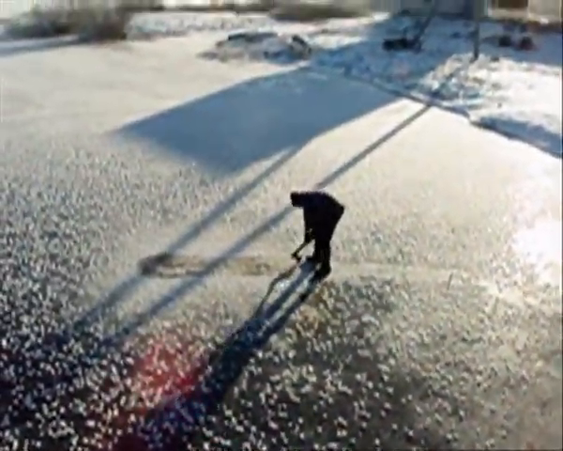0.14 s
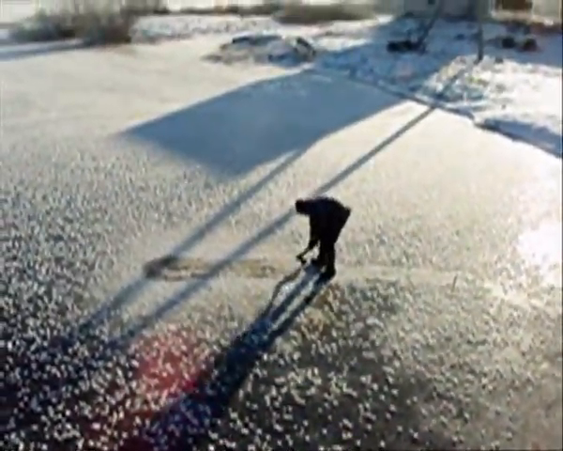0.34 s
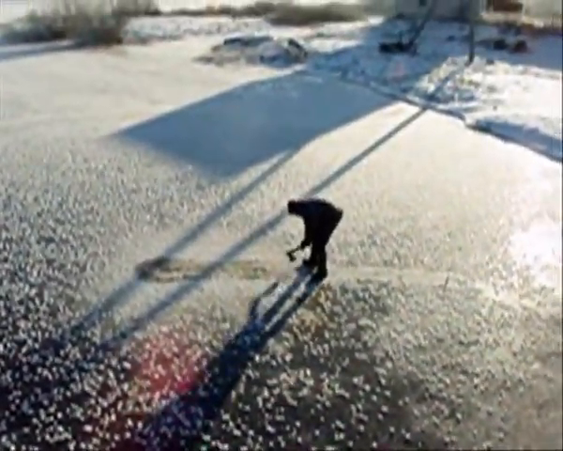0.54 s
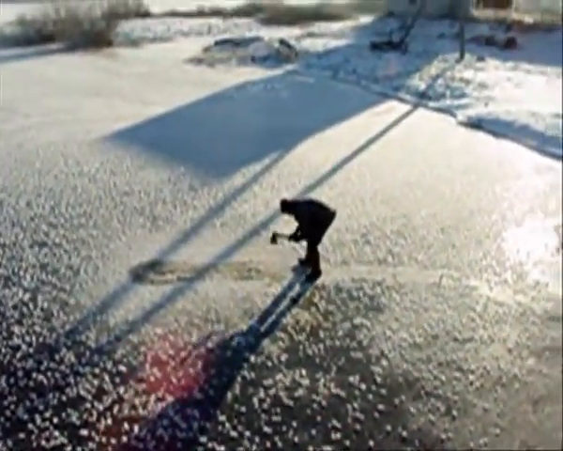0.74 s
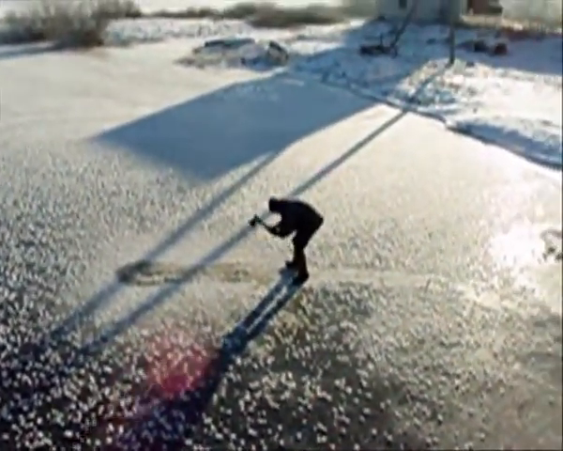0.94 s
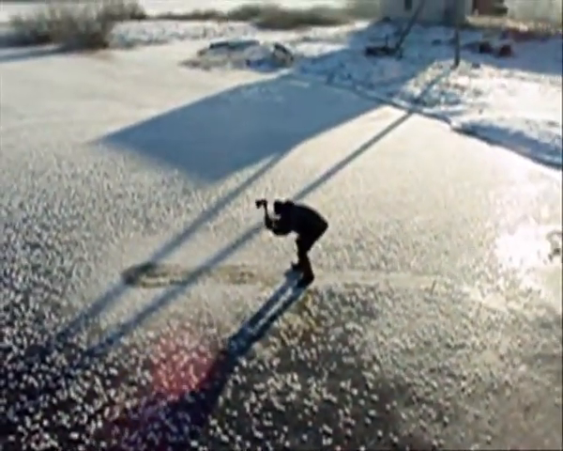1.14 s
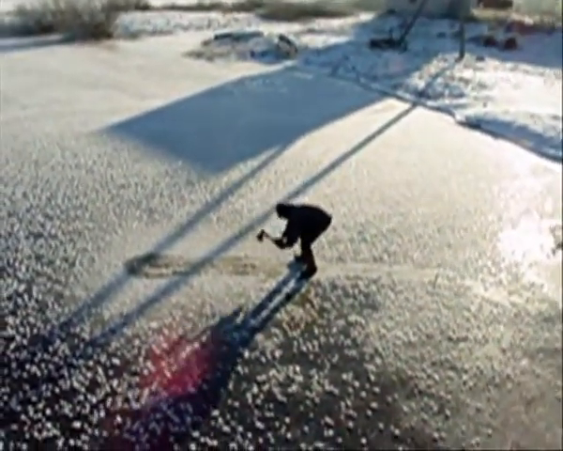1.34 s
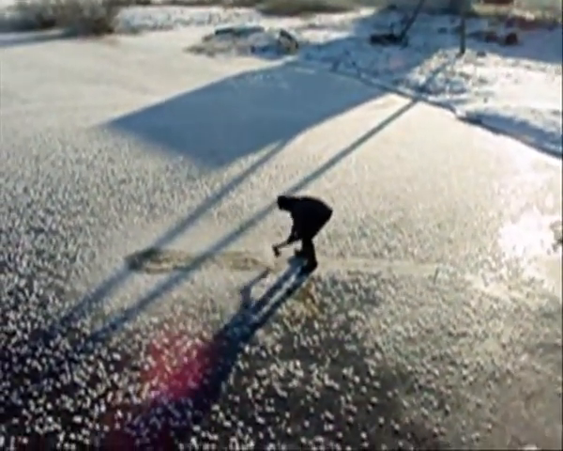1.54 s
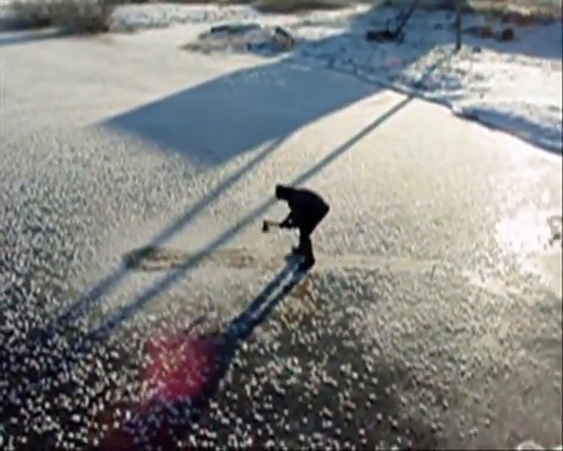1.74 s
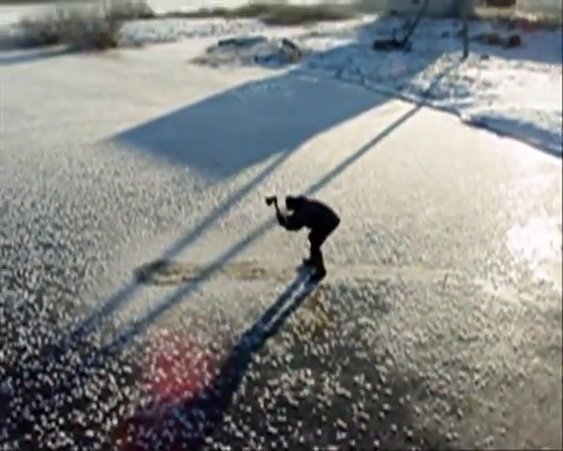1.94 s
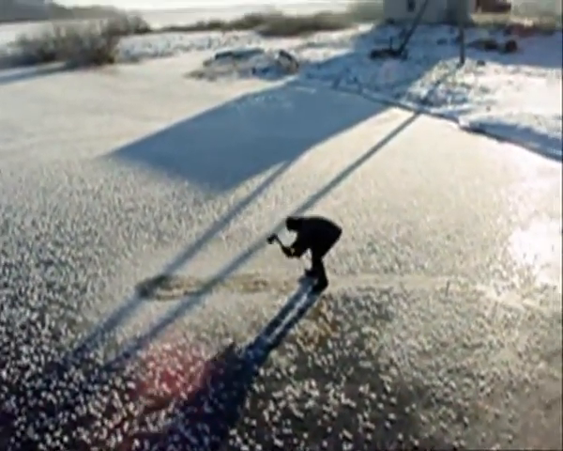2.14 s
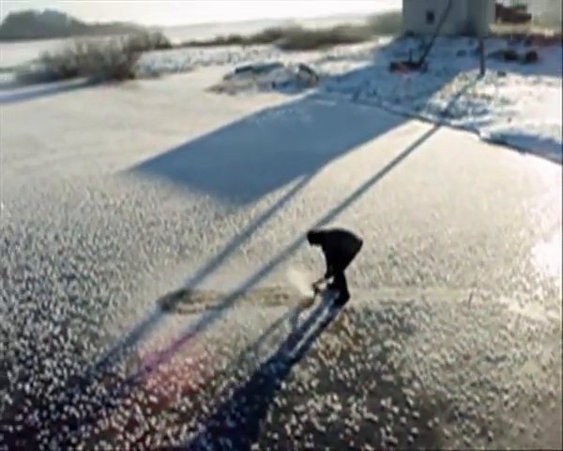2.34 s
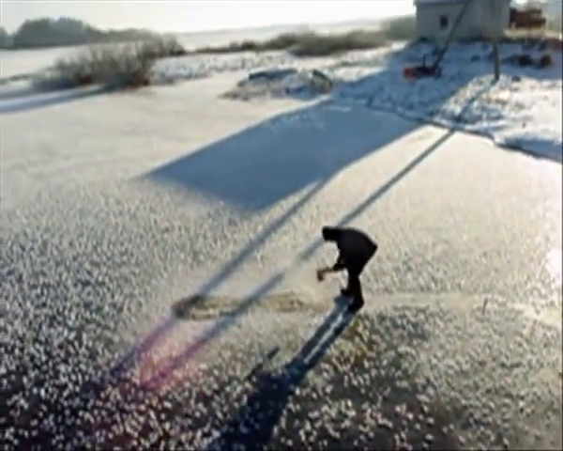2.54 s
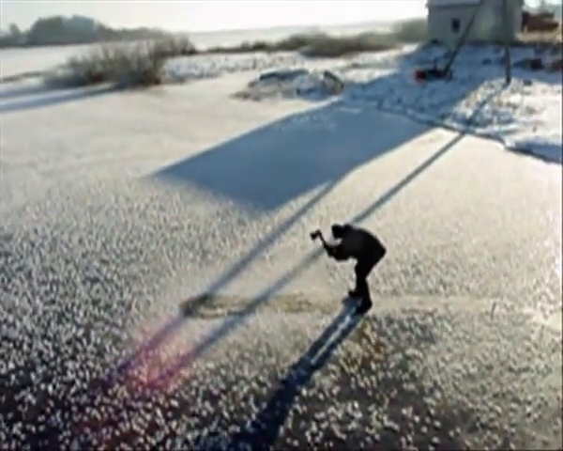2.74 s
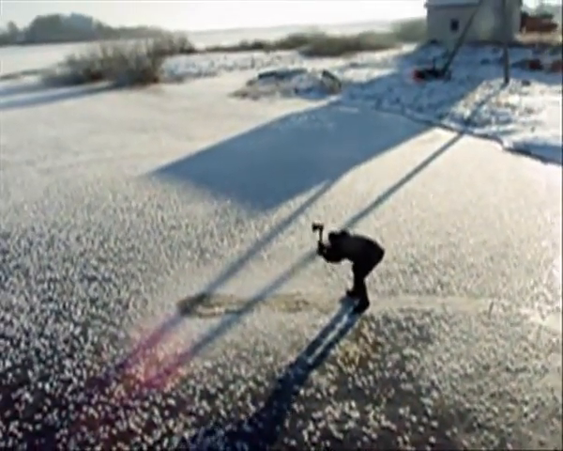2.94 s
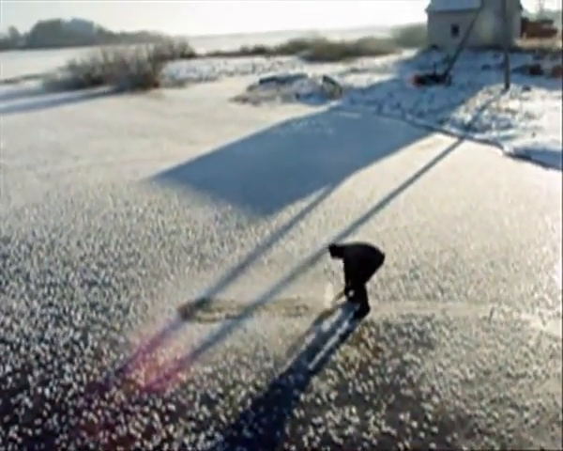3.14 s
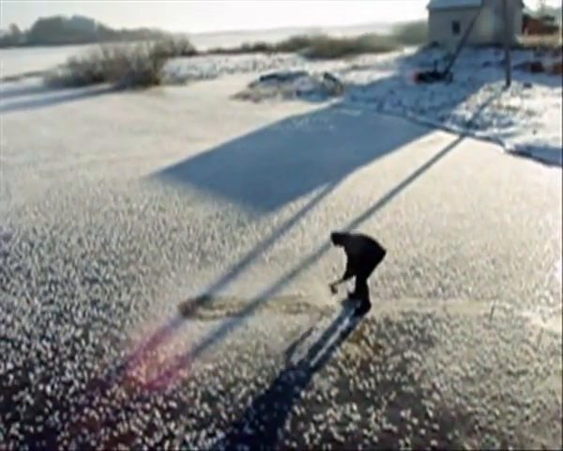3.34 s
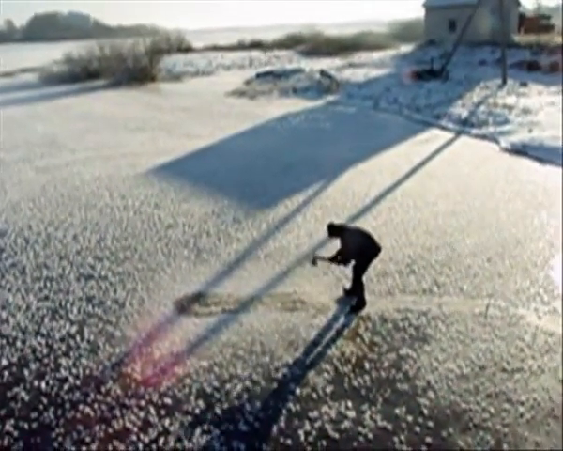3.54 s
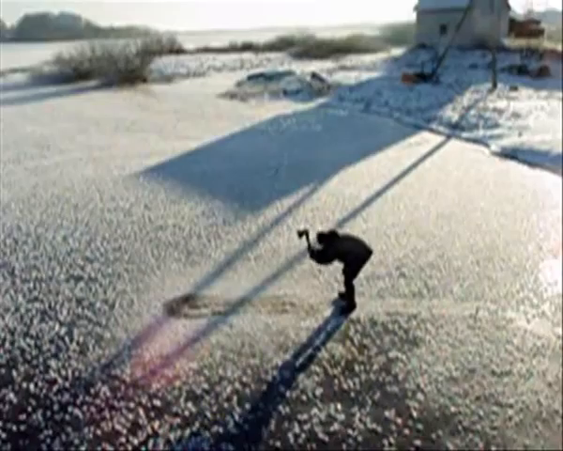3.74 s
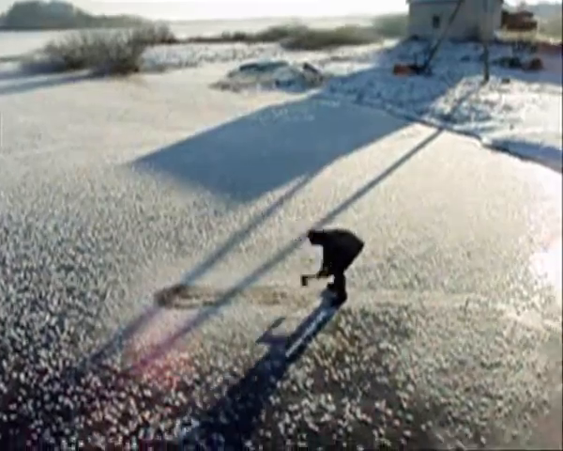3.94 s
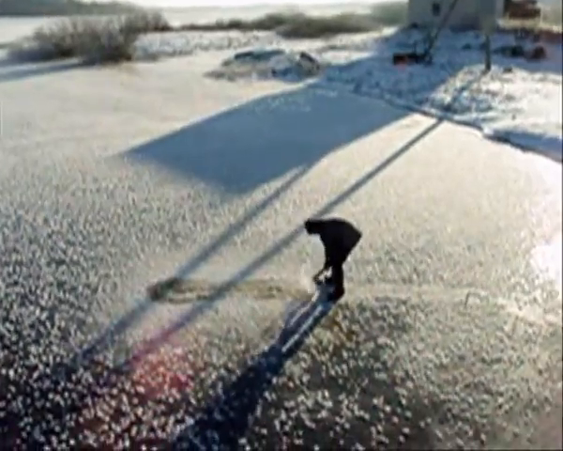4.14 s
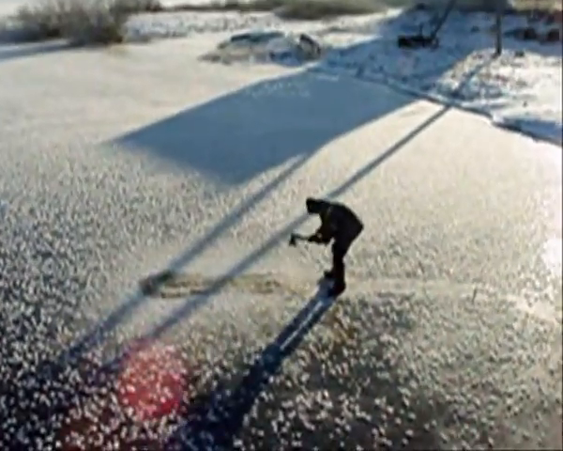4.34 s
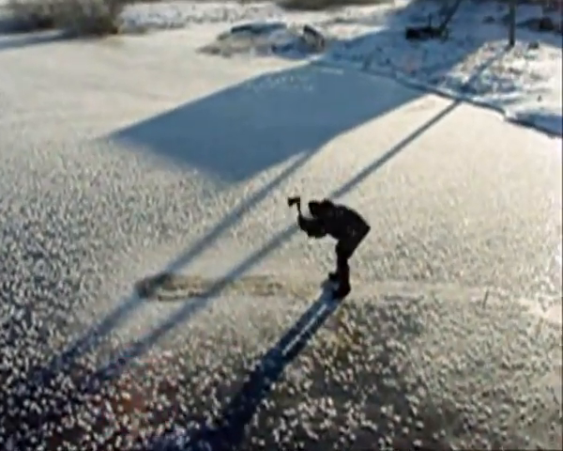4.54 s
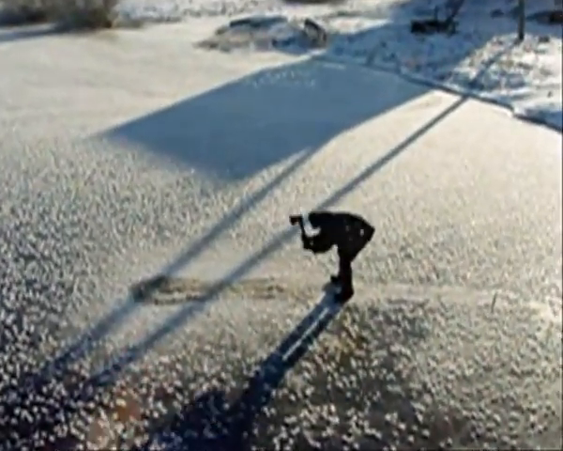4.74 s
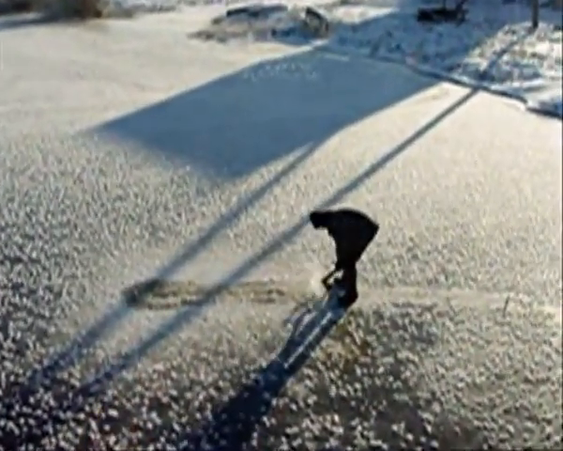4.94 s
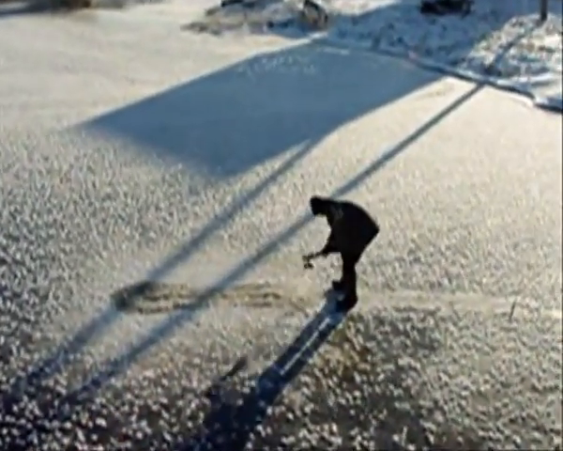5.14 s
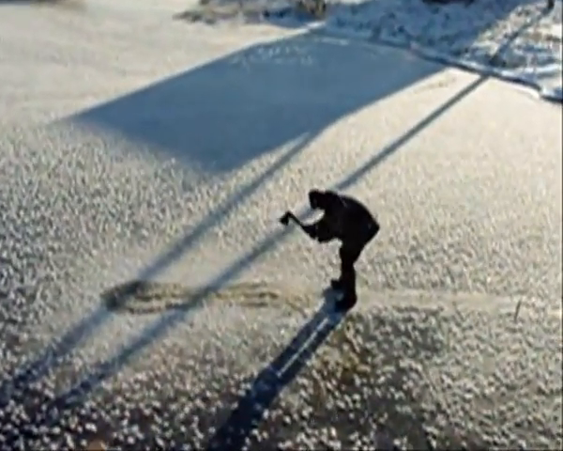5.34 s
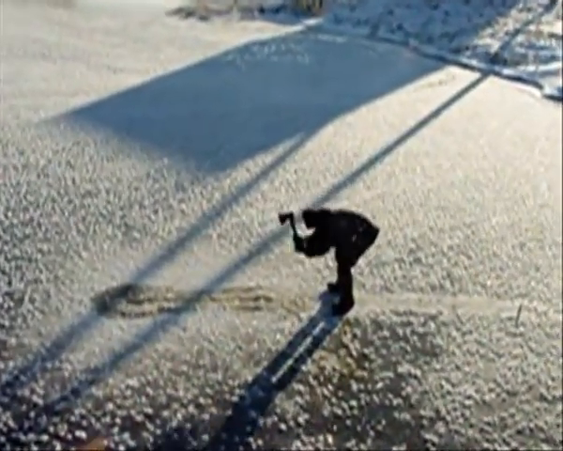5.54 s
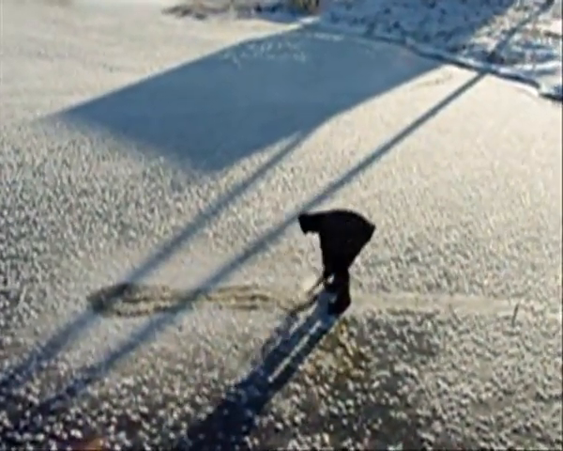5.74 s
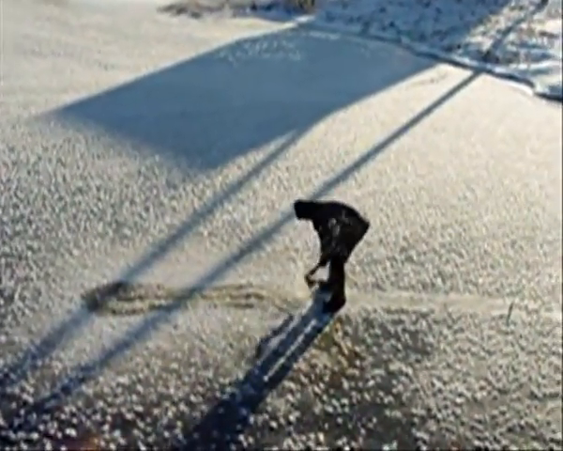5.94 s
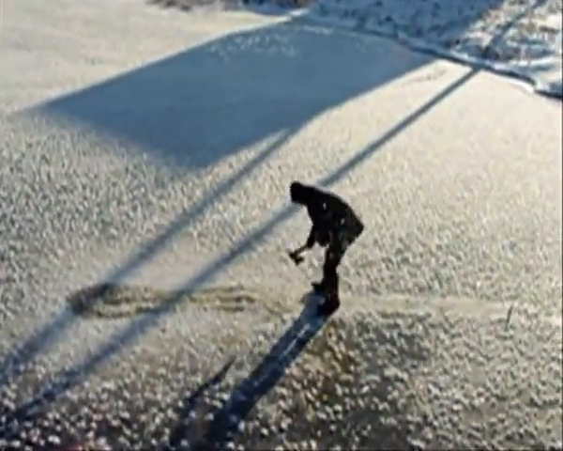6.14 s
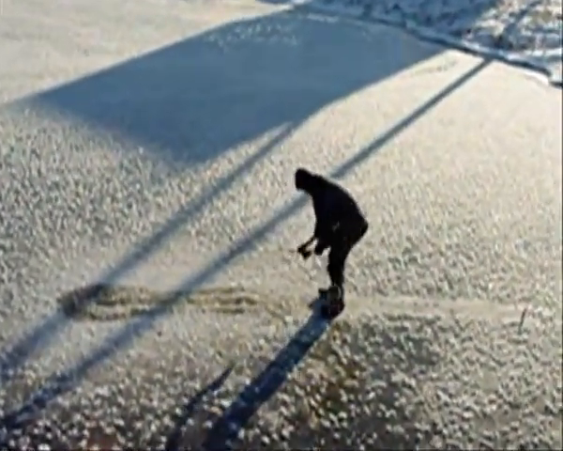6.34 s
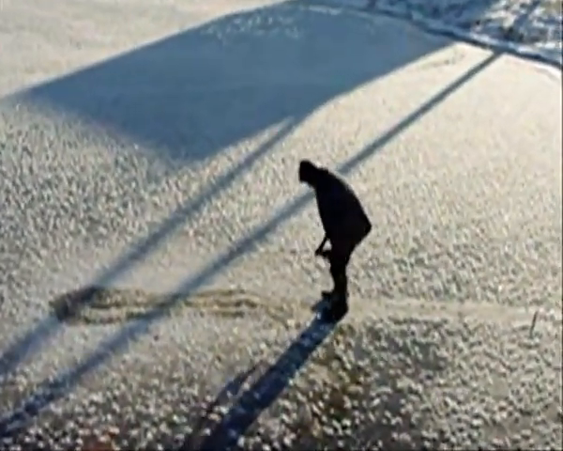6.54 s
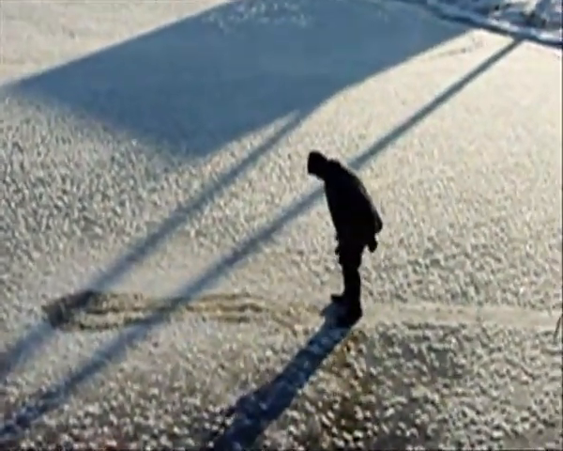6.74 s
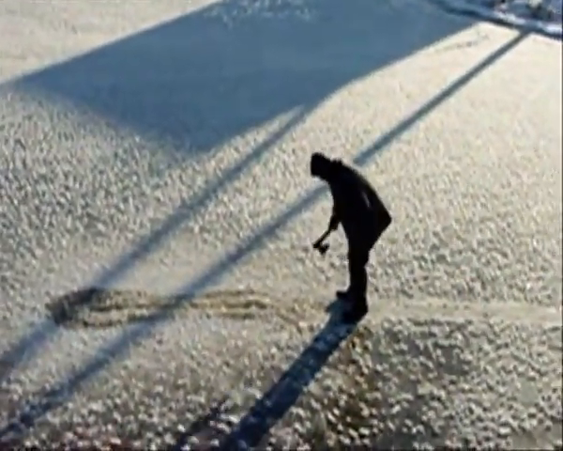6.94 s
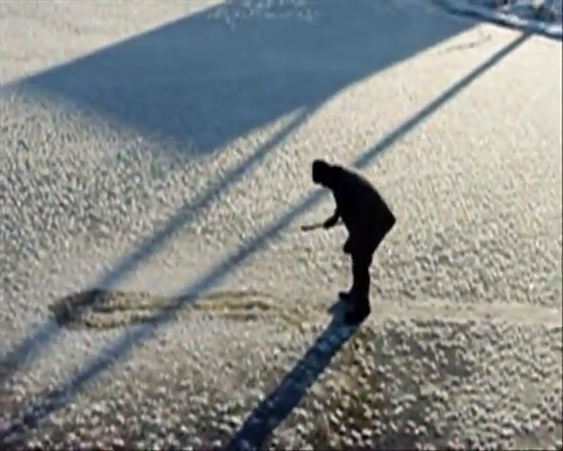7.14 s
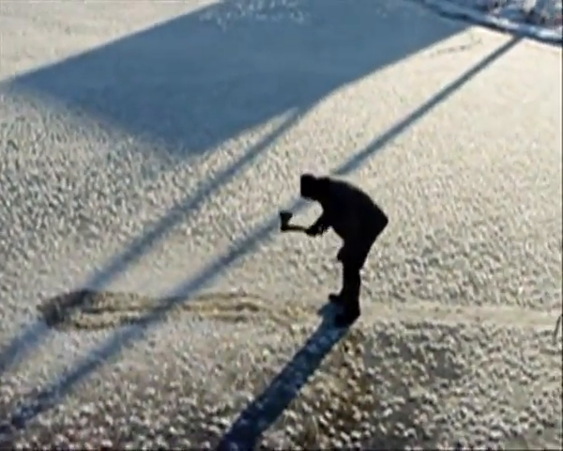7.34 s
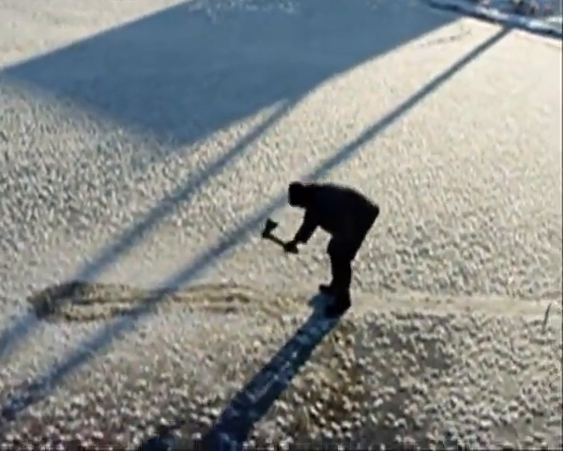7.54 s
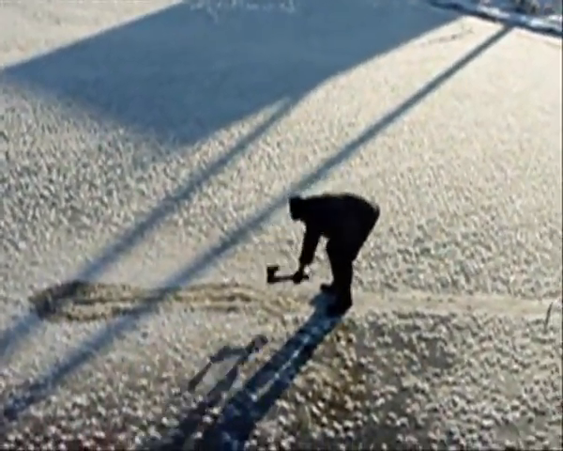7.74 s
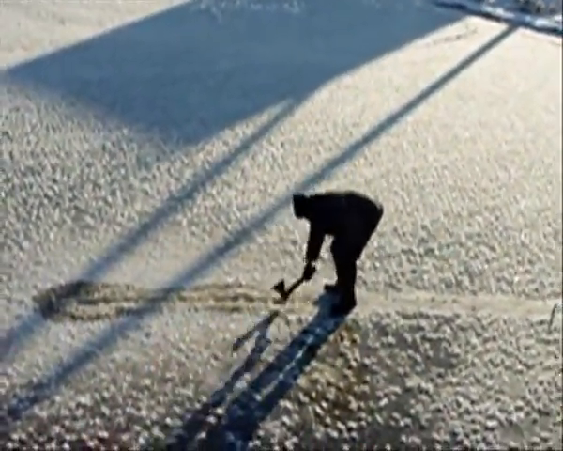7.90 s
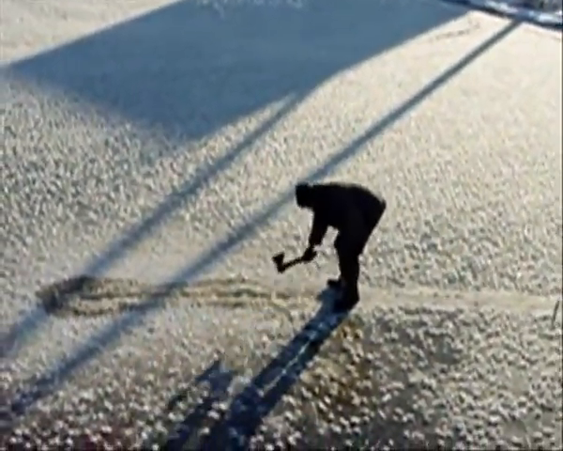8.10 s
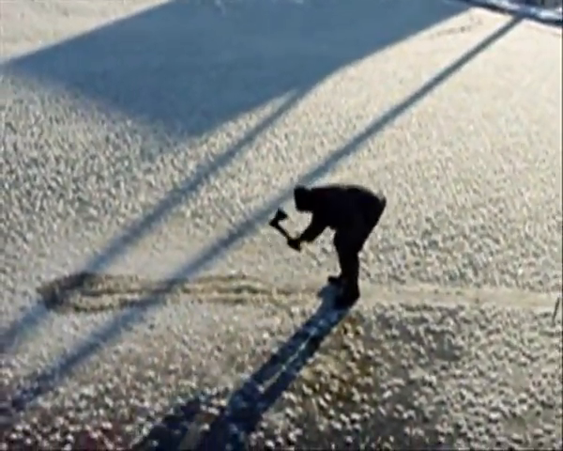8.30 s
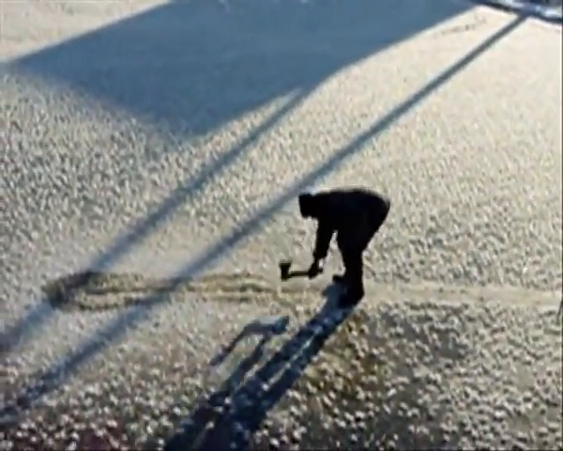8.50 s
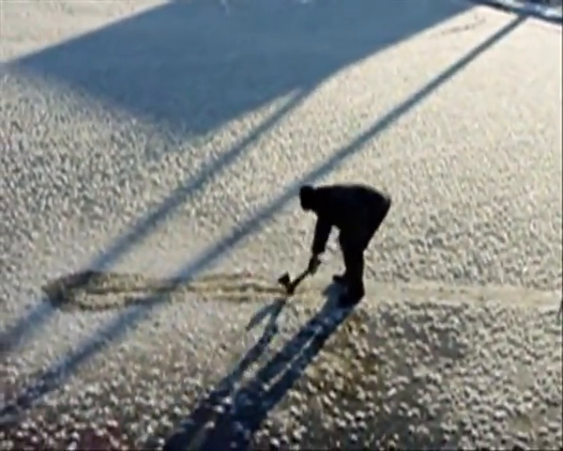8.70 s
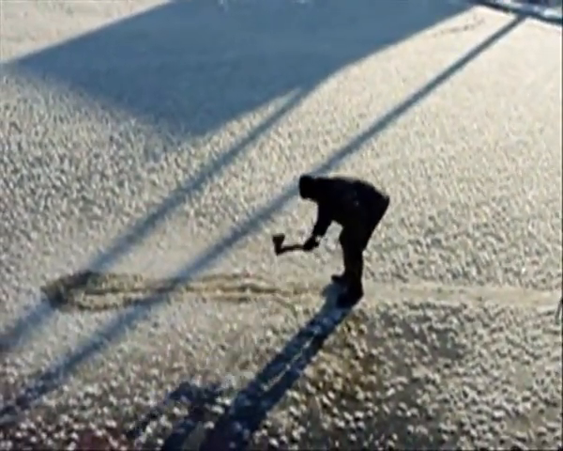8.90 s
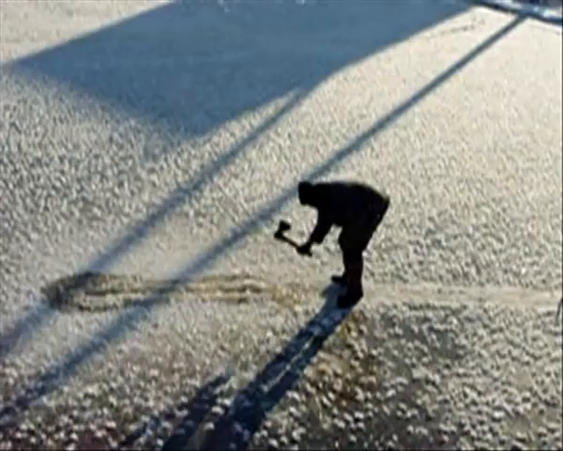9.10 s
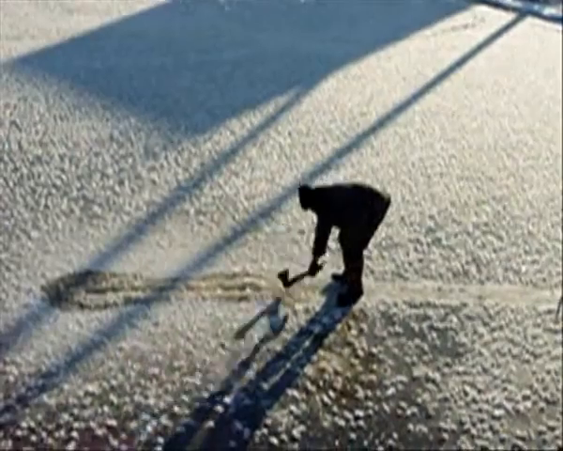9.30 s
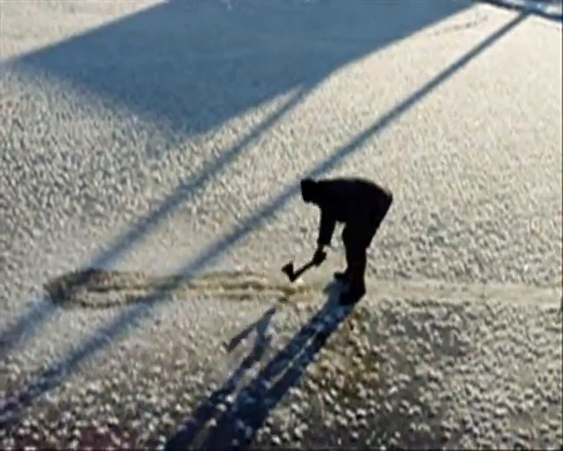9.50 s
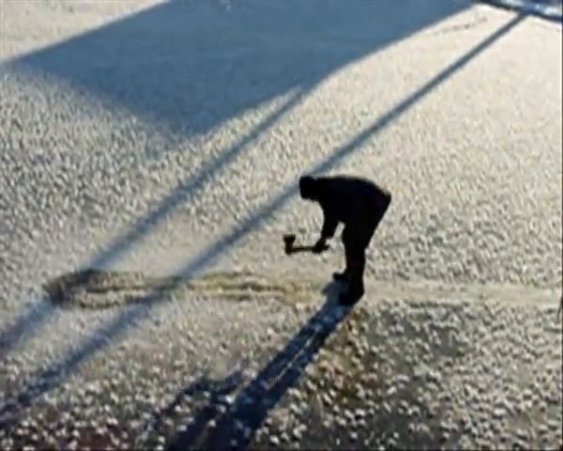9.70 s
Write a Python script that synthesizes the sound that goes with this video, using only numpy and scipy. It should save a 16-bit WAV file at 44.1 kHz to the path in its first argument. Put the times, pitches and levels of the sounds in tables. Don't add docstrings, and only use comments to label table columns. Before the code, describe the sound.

On an open frozen lake, a small microphone near the chopper picks up light frosty scuffing, ticking chips and very faint far chops at first, with wind rising in soft bass lumps. At 1.6 s a hatchet cracks hard into the ice, then again at 2.4, 3.3, 4.2, 5.0 and 5.9 s: bright, dry splits with a quick falling chirp, thud, scattering chips, faint wall echo and fading sheet hum. A second, distant chopper lands softer chirping blows at about 2.9, 4.15, 4.9, 5.5 and 6.0 s. From 6.3 to 7.1 s boots snap and scrape the crust in a dense crackle, with a wind puff and faint distant blows around 7 s. Duller, deeper, weaker near chops fall at 7.9, 8.7 and 9.5 s; a metal pole rings briefly at 8.5 s. Low rumble and frost hiss continue to the end.

```python
import sys
import numpy as np
from scipy import signal
from scipy.fft import rfft, irfft
from scipy.io import wavfile
from scipy.ndimage import uniform_filter1d

SR = 44100
rng = np.random.default_rng(int(sys.argv[2]) if len(sys.argv) > 2 else 0)


def wav_out(sig):
    wavfile.write(sys.argv[1], SR, np.round(np.clip(np.atleast_2d(sig).T, -1, 1) * 32767).astype(np.int16))


def voltage_ratio(level):
    return 10 ** (np.asarray(level, float) / 20)


N = 434826
T = (np.arange(32768) - 4096) / SR
WALL_S = .088

# arrival of the crack in seconds, crack peak in dB, ice wave peak in dB,
# sheet hum in dB, thud pitch in Hz.
NEAR_BLOWS = [
    (1.5908, 3, -10, -37, 288),
    (2.4192, 2.5, -19, -45, 285),
    (3.2868, 3, -13, -34, 293),
    (4.1675, 3, -4, -37.5, 294),
    (5.013, 3.5, -9.5, -31.5, 820),
    (5.8684, 1.5, -18, -30, 804),
    (7.945, -9, -5.5, -29, 467),
    (8.729, -11, -4, -28.5, 266),
    (9.479, -15, -17.5, -36, 410),
]
# arrival of the crack in seconds, crack peak in dB, ice wave peak in dB,
# lead of the wave over the crack in seconds, sheet hum in dB.
FAR_BLOWS = [
    (2.902, -19.5, -17, .039, -33),
    (4.152, -20, -12.5, .03, -24),
    (4.9322, -17.5, -11, .033, -25),
    (5.5045, -20, -13.5, .038, -30),
    (6.0352, -30, -18, .04, -35),
    (.235, -55, -31, .038, -42),
    (7.822, -50, -33, .036, -46),
]
# frequency in Hz, density in dB per Hz.
SCUFF_COLOUR = [(590, -0.5), (1000, 2.5), (1090, -3.5), (1340, -2), (3100, -6.5), (3650, -9), (4720, -3),
                (5630, -4.5), (8470, -5), (9860, -10.5), (10600, -23.5), (15200, -17.5), (16300, -28)]
# time in seconds, level in dB.
MOVEMENT = [(0.0, -46), (0.52, -53.5), (1.37, -56.5), (2.47, -51), (3.21, -51.5), (3.46, -47.5),
            (4.15, -53.5), (4.31, -51.5), (4.72, -57.5), (5.05, -50), (5.77, -56), (5.93, -51),
            (6.73, -50.5), (7.58, -58), (8.59, -53.5), (8.7, -51), (9.31, -58), (9.86, -56.5)]
# start in seconds, peak in dB, centre in Hz,
# depth of the treble dropout after it in dB.
CRUST_SNAPS = [(0.0034, -22.5, 2210, 15), (0.6626, -26.5, 6310, -12), (2.13, -21, 5430, 14),
               (2.576, -24, 4780, 7), (3.0733, -25, 3500, 12), (3.2344, -26.5, 7200, 12),
               (3.707, -29, 7560, 10), (4.3098, -21, 1400, 28), (4.4464, -20, 7400, 1),
               (4.728, -27.5, 7500, -5), (4.7845, -28.5, 1960, 16), (4.853, -28, 6730, -3),
               (5.2833, -26, 4800, 13), (5.3535, -15, 6500, 41), (5.761, -27, 7900, 10),
               (6.283, -25.5, 1190, 8), (6.317, -27.5, 4550, 6), (6.3961, -19, 2980, -4),
               (6.5588, -16.5, 7400, 34), (6.6065, -21.5, 5460, 16), (6.6421, -22, 5700, 14),
               (6.6814, -20, 2450, 15), (6.6972, -20.5, 8950, 30), (6.7985, -20.5, 7380, 31),
               (6.8278, -27.5, 8450, 9), (6.862, -20, 6500, 19), (7.06, -28.5, 5900, 3),
               (8.198, -30.5, 5370, 12), (9.347, -38, 3400, 38), (1.8821, -36, 6000, -1),
               (4.394, -32, 7000, 0), (4.4308, -28, 8730, 12), (4.54, -28, 7500, 14),
               (8.327, -33, 8000, 12), (8.345, -40, 8000, 0), (2.4877, -27, 2290, 0),
               (2.5591, -28, 4000, 0), (6.338, -30, 5480, 0), (6.5904, -30, 7870, 0),
               (6.7266, -28, 4760, 8), (6.8503, -27, 4710, 0), (1.6631, -27, 4500, 0),
               (7.5946, -30, 4920, 0), (7.615, -31, 2300, 5), (7.955, -45, 4000, 20),
               (4.794, -33, 5000, 20), (9.555, -32, 2500, 0)]


def evened(x):
    return x / np.sqrt(np.mean(x ** 2) + 1e-20)


def peaked(x):
    return x / (abs(x).max() + 1e-20)


def read(points, hz):
    f, value = np.transpose(points)
    return np.interp(np.log(hz + 1), np.log(f + 1), value)


def add(mix, s, sound):
    part = mix[max(round(s * SR), 0):][:len(sound)]
    part += sound[:len(part)]


def shelved(x, points):
    hz = np.fft.rfftfreq(len(x), 1 / SR)
    return irfft(rfft(x) * voltage_ratio(read(points, hz)), len(x))


def colour(x, points):
    return evened(shelved(x, points))


def resonate(x, hz, width):
    turn = np.exp(2j * np.pi * hz * np.arange(len(x)) / SR)
    r = np.exp(-np.pi * width / SR)
    return 2 * (turn * signal.lfilter([1 - r], [1, -r], x / turn)).real


def resonate_twice(x, hz, width):
    return resonate(resonate(x, hz, width), hz, width)


def swell(t, rise, t60):
    return np.where(t < 0, np.exp(np.minimum(t, 0) / rise), voltage_ratio(-60 * np.maximum(t, 0) / t60))


def lumpy(noise, depth_db, size):
    return voltage_ratio(depth_db * evened(uniform_filter1d(noise, size)))


def bed(points, level_db, lumps_db, lump_s):
    noise, chance = rng.standard_normal((2, N))
    size = max(round(lump_s * SR), 2)
    lumps = lumpy(uniform_filter1d(chance, size), lumps_db, size)
    return evened(colour(noise, points) * lumps) * voltage_ratio(level_db)


def ticks(table, t60, sharp, fizz):
    out, t = np.zeros(N), np.arange(-88, 2000) / SR
    for (s, db, hz, *_), noise in zip(table, rng.standard_normal((len(table), len(t)))):
        snap = noise * swell(t, 0.000087, t60)
        body = resonate(resonate(snap, hz, sharp * hz), hz, 1.5 * hz)
        add(out, s + t[0], voltage_ratio(db) * peaked(body + fizz * resonate(snap, 4100, 4500)))
    return out


def wind():
    # frequency in Hz, density in dB per Hz.
    wind_colour = [(12, -17), (20, -6.5), (76, 2), (118, -0.5), (214, -6), (387, -18.5), (443, -15),
                   (500, -20), (650, -38), (1100, -120)]
    # time in seconds, level in dB.
    gusts = [(0.0, -62), (0.5, -67), (1.1, -50.5), (1.64, -48.5), (2.39, -40.5), (2.62, -47.5),
             (2.95, -40.5), (3.51, -45), (4.0, -49), (4.3, -52), (5.3, -62.5), (6.65, -67), (6.8, -44.5),
             (7.15, -44.5), (7.6, -61.5), (8.87, -53.5), (9.3, -63), (9.86, -67)]
    # time in seconds, level in dB.
    buffets = [
        (.15, -50),
        (4.4, -60),
        (4.68, -56),
        (5.0, -37),
        (6.85, -44),
    ]
    t = np.arange(N) / SR
    level = voltage_ratio(np.interp(t, *np.transpose(gusts)) + 2.5)
    level = level + sum(voltage_ratio(db) * swell(t - s, 0.029, 0.3) for s, db in buffets)
    return bed(wind_colour, 0 * t, 3.5, 0.02) * level


def movement_db():
    return np.interp(np.arange(N) / SR, *np.transpose(MOVEMENT))


def rumble():
    # frequency in Hz, density in dB per Hz.
    rumble_colour = [(71, -39), (120, -19.5), (187, -7), (245, -6), (367, -4), (437, -7), (1080, -15),
                     (1250, -15.5), (1610, -23), (3000, -17), (3900, -31), (6600, -120)]
    stir_db = movement_db()
    return bed(rumble_colour, -50.5 + 0.17 * (stir_db - stir_db.mean()), 2.1, 0.022)


def crackle(per_s, spread_db):
    size = voltage_ratio(spread_db * np.minimum(rng.exponential(1, N), 4))
    clicks = size * (rng.random(N) < per_s / SR)
    return colour(clicks * rng.choice([-1., 1.], N), SCUFF_COLOUR)


def frost_hiss():
    stir_db = movement_db()
    return bed(SCUFF_COLOUR, stir_db + 2.0, 3.06, 0.0043) + voltage_ratio(stir_db - 2.45) * crackle(600, 3.2)


def whine():
    return voltage_ratio(-67) * evened(resonate_twice(rng.standard_normal(N), 7450, 35))


def drone():
    noise, chance = rng.standard_normal((2, N))
    return voltage_ratio(-53.5) * evened(resonate_twice(noise, 460, 150) * lumpy(chance, 3.5, 2000))


def flutter(hz, t):
    cells = rng.random((len(t) // 4 + 2, 6))
    stir_db = np.interp(np.arange(len(cells)) * t[4], *np.transpose(MOVEMENT))
    busy = voltage_ratio(stir_db - np.mean(MOVEMENT, 0)[1])[:, None]
    share = np.clip(.17 * busy, .01, .5)
    dropped = uniform_filter1d(cells, size=2, axis=1) < np.sqrt(share / 2)
    band = np.clip((hz - 4600) // 1000, 0, 5).astype(int)
    treble = ((hz > 4600) & (hz < 10100))[:, None]
    return 12 * dropped[np.arange(len(t)) // 4][:, band].T * treble


def dropouts(x):
    hz, t, z = signal.stft(x, SR, nperseg=256)

    def between(start, end):
        return (t > start) & (t < end)

    treble_db = sum(row[3] * between(row[0] + .006, row[0] + .028) for row in CRUST_SNAPS)
    for row in NEAR_BLOWS[:6]:
        echo_s = row[0] + WALL_S
        treble_db = treble_db + 4.0 * between(echo_s + .012, echo_s + .04)
    treble_db = treble_db + sum(4.0 * between(row[0] - .03, row[0] - .004) for row in FAR_BLOWS)
    ahead_db = sum(16.0 * between(row[0] - .024, row[0] - .008) for row in NEAR_BLOWS)
    patches = uniform_filter1d(rng.standard_normal(z.T.shape), 9, 0)
    patches = evened(uniform_filter1d(patches, 20, 1)).T
    reach = (hz > 4600) * np.where(hz < 10100, 1, .4)
    cut_db = np.outer(reach, np.maximum(treble_db, 0)) + np.outer(hz > 250, ahead_db)
    cut_db += 1.5 * patches + 10.0 * (patches > 1.5) * ((hz > 3500) & (hz < 10100))[:, None]
    cut_db += flutter(hz, t)
    return signal.istft(z * voltage_ratio(-cut_db), SR, nperseg=256)[1][:N]


def snaps():
    return ticks(CRUST_SNAPS, 0.011, 0.13, 0.42)


def scrapes():
    # start in seconds, end in seconds, level in dB, centre in Hz.
    drags = [(0.048, 0.376, -45, 2480), (0.328, 0.371, -40.5, 2220), (5.842, 5.867, -25, 2500),
             (5.955, 6.017, -31.5, 1600), (6.979, 7.05, -45.5, 1500), (2.181, 2.33, -47.5, 2170),
             (4.409, 4.55, -46, 6000), (6.41, 6.527, -42, 3500), (6.891, 7.127, -45, 4560),
             (7.503, 7.632, -43, 6060), (9.599, 9.717, -45.5, 7000), (8.665, 8.687, -45, 2000),
             (7.06, 7.17, -45, 900), (7.42, 7.47, -47, 900), (.16, .35, -48, 700), (2.92, 3.0, -42, 900),
             (8.66, 8.702, -45, 7000), (8.605, 8.645, -45, 7500), (8.55, 8.6, -50, 8000),
             (7.97, 8.09, -46, 6500), (9.046, 9.23, -49.5, 6000)]
    out = np.zeros(N)
    for (start, end, db, hz), noise in zip(drags, rng.standard_normal((len(drags), 2, SR // 2))):
        u = np.arange(SR // 2) / SR / (end - start)
        grain = lumpy(noise[1], 3.7, 120)
        rub = evened(resonate(colour(noise[0], SCUFF_COLOUR), hz, 1.6 * hz) * grain)
        add(out, start, voltage_ratio(db) * rub * np.clip(3 * u, 0, 1) * np.clip(14 * (1 - u), 0, 1))
    return out


def chips():
    # start in seconds, peak in dB, centre in Hz.
    landings = [(0.0894, -24, 800), (0.5743, -37, 1350), (0.842, -29, 2030), (0.861, -29, 2540),
                (0.8944, -33, 2500), (0.9218, -29, 1660), (0.9647, -26, 1590), (1.294, -29.5, 1860),
                (1.4887, -37, 1510), (1.36, -40, 1500), (1.715, -29, 3000), (2.173, -23, 1140),
                (2.196, -30, 2070), (2.2348, -27.5, 1250), (2.508, -23, 2600), (2.953, -27, 800),
                (2.618, -25.5, 1800), (2.657, -26, 2220), (2.7284, -26, 1210), (3.412, -21, 2580),
                (3.4837, -30, 1780), (3.7599, -30, 2610), (3.921, -28.5, 2140), (4.2004, -43, 3550),
                (4.9874, -26, 2440), (5.7398, -31.5, 3240), (5.983, -28, 1920), (5.9968, -29, 1490),
                (6.628, -26, 7720), (8.313, -31, 1170), (8.478, -43, 4500)]
    return ticks(landings, 0.014, 0.49, 0.033)


def ice_wave(lead, shape, meet_hz, power):
    hz = np.fft.rfftfreq(len(T), 1 / SR)
    delay = lead * ((meet_hz / np.maximum(hz, 255)) ** power - 1) - T[0]
    phase = 2 * np.pi * np.cumsum(delay) * hz[1]
    return peaked(irfft(voltage_ratio(read(shape, hz)) * np.exp(-1j * phase), len(T)))


def bites(noise, spread):
    push, t = noise[:3000], np.arange(3000) / SR
    return push * abs(push) * np.exp(-t / spread) * (abs(push) > 2.3)


def rough_wave(wave, noise, spread, share):
    scattered = signal.oaconvolve(wave, bites(noise, spread))[:len(wave)]
    return peaked(wave + share * peaked(scattered))


def sheet_hum(noise, hz, width, t60):
    lumps = lumpy(noise[::-1], 3.5, 700)
    return evened(resonate_twice(noise, hz, width) * lumps) * swell(T - .012, 0.0072, t60)


def far_blow(row, touch_ahead_s, touch_db, faint):
    # frequency in Hz, level in dB.
    wave_shape = [(280, -18), (370, 7), (450, 12), (700, 0), (1200, -10), (2200, -23), (3200, -45)]
    s, crack_db, wave_db, lead, hum_db = row
    noise = rng.standard_normal((4, len(T)))
    scatter = 9 if faint else 1.5
    clean = ice_wave(lead, wave_shape, 430, 2.1)
    clean = clean + voltage_ratio(touch_db) * np.roll(clean, -round(touch_ahead_s * SR))
    wave = rough_wave(clean, noise[3], .011 + .0025 * scatter, scatter)
    if faint:
        wave = peaked(resonate(wave, 480, 300) * lumpy(noise[2], 4, 300))
    crack = peaked(colour(noise[0], SCUFF_COLOUR) * swell(T - .002, 0.0024, 0.041))
    hum = sheet_hum(noise[1], 419, 105, 0.43)
    return voltage_ratio(wave_db) * wave + voltage_ratio(crack_db) * crack + voltage_ratio(hum_db) * hum


def far_chopper():
    # arrival of the crack in seconds, crack peak in dB, ice wave peak in dB,
    # lead of the wave in seconds, sheet hum in dB.
    faint_blows = [(.125, -54, -39, .040, -41.5), (.19, -55, -36, .03, -55), (0.32, -40, -31.5, 0.031, -55),
                   (.45, -60, -46, .04, -48), (.65, -60, -39, .04, -50), (.73, -60, -43, .04, -50),
                   (7.02, -27.5, -25.5, 0.045, -57), (7.10, -37, -29.5, 0.024, -36.5),
                   (7.185, -56, -39, 0.03, -59), (7.454, -40, -28, 0.039, -42),
                   (7.565, -43, -36, 0.041, -51)]
    # first touch ahead in seconds, its level in dB.
    first_touches = [
        (.004, -30),
        (.011, -4),
        (.009, -5),
        (.004, -30),
        (.008, -20),
        (.008, -30),
        (.008, -30),
    ]
    out = np.zeros(N)
    for row, touch in zip(FAR_BLOWS, first_touches):
        add(out, row[0] + T[0], far_blow(row, *touch, faint=False))
    for row in faint_blows:
        add(out, row[0] + T[0], far_blow(row, .01, -6, faint=True))
    return out


def near_blow(row, dull_db, lag, t60, upper_db):
    # frequency in Hz, density in dB per Hz.
    crack_colour = [(88, -30), (150, 1), (300, 6.5), (871, 6), (1340, 1.5), (2450, 3.5), (3490, 0),
                    (4000, -52), (4410, -11), (6020, -2.5), (8230, -6), (9820, -9), (10800, -30),
                    (14800, -10), (16000, -50)]
    # frequency in Hz, width in Hz, level in dB.
    blade_rings = [(2474, 270, 6.5), (3930, 680, 4.5), (1780, 220, 0.5), (5600, 2600, -30)]
    # frequency in Hz, level in dB.
    wave_shape = [(110, -36), (190, -5), (290, 0), (450, 0), (700, -3), (950, -6), (1300, -18), (3000, -60)]
    s, crack_db, wave_db, hum_db, thud_hz = row
    noise = rng.standard_normal((4, len(T)))

    burst = noise[0] * (swell(T - .0012, 0.0013, t60) + 0.1 * swell(T + 0.00062, 0.002, 0.0033))
    ring = 0
    for hz, width, db in blade_rings:
        line = resonate(resonate(burst, hz, width), hz, 7700)
        ring = ring + voltage_ratio(db + upper_db * (hz > 3000)) * evened(line)
    split = voltage_ratio(crack_db + 0.3) * peaked(colour(burst, crack_colour) + 0.95 * evened(ring))
    chunk = peaked(resonate(noise[1] * swell(T - .009, 0.0012, 0.0073), 2600, 2700))

    returned = rough_wave(resonate(split, 3230, 2600), noise[2], 0.0023, 0.42)
    echo = voltage_ratio(-22.5) * abs(split).max() * np.roll(returned, round(WALL_S * SR))

    thud = peaked(resonate_twice(noise[2] * swell(T - .003, 0.00083, 0.01725), thud_hz, 230))
    hum = sheet_hum(noise[1], 368, 200, 0.79)

    bass_db = -0.18 * crack_db
    shape = [(hz, db + bass_db * np.log2(500 / hz) + dull_db * max(np.log2(hz / 500), 0))
             for hz, db in wave_shape]
    wave = rough_wave(ice_wave(0.01113, shape, 335, 1.716), noise[3], .003, .15)
    wave = np.roll(wave * swell(T - .002, .04, .06), round(lag * SR))

    air = split + voltage_ratio(crack_db - 17.0) * chunk + echo
    return air + voltage_ratio(hum_db + 20) * thud + voltage_ratio(wave_db) * wave + voltage_ratio(hum_db) * hum


def near_chopper():
    # wave dullness in dB per octave above 500 Hz, wave lag in seconds,
    # crack t60 in seconds, upper ring in dB.
    bite = [
        (-6, .0015, .023, 6),
        (1, .001, .026, -4),
        (-1, 0, .025, -3),
        (0, .0015, .026, 0),
        (-3, .0015, .021, 0),
        (-4, .002, .034, -3),
        (-11, .0015, .012, -6),
        (-9, .0005, .014, -6),
        (-6, .004, .03, 0),
    ]
    out = np.zeros(N)
    for row, settings in zip(NEAR_BLOWS, bite):
        add(out, row[0] + T[0], near_blow(row, *settings))
    return out


def sprays():
    # frequency in Hz, density in dB per Hz.
    spray_colour = [(88, -41), (150, -13), (328, 7), (391, -8), (448, -4.5), (979, -7), (1100, -11),
                    (1390, -10.5), (2600, -23), (4320, -24.5), (8400, -23.5), (16000, -78)]
    out = np.zeros(N)
    fall = swell(T - .012, 0.0069, 0.69) + 2.2 * swell(T - .014, 0.009, 0.039)
    for row, noise in zip(NEAR_BLOWS, rng.standard_normal((len(NEAR_BLOWS), 3, len(T)))):
        grain = lumpy(noise[1:], 2.8, 170)
        ringing = 0.42 * evened(resonate(noise[0], 2260, 940)) * grain[1] ** 2
        thrown = colour(noise[0], spray_colour) * grain[0] + ringing
        level_db = -31 + 0.5 * row[1]
        add(out, row[0] + T[0], voltage_ratio(level_db) * evened(thrown) * fall)
    return out


def extra_cracks():
    # start in seconds, peak in dB, centre in Hz.
    crack_bursts = [(5.0168, -6, 2600), (5.017, -6, 780), (2.4238, -7, 2600), (2.437, -22, 2400),
                    (1.5975, -13, 2700), (3.2915, -10, 600), (7.9455, -7, 600), (8.7295, -6, 350),
                    (5.875, -8, 800), (5.874, -11, 2290), (9.482, -10.5, 800), (9.484, -18, 328),
                    (5.858, -22, 900), (5.864, -17, 2220), (8.530, -32, 4500), (9.4684, -13, 2360)]
    return ticks(crack_bursts, 0.035, .35, 0.042)


def pings():
    # start in seconds, peak in dB, pitch in Hz.
    hollow_chips = [
        (1.8282, -32, 1425),
        (1.829, -28, 2800),
        (1.637, -26, 2600),
        (4.24, -29, 3700),
        (4.52, -30, 2440),
        (5.255, -29, 2200),
        (8.032, -37, 1790),
    ]
    return ticks(hollow_chips, 0.013, 0.094, 0)


def knocks():
    # start in seconds, peak in dB, centre in Hz.
    lumps = [
        (3.568, -25, 250),
        (7.905, -29, 342),
        (9.071, -28, 386),
        (9.406, -35, 474),
        (7.712, -36, 400),
        (7.67, -40, 450),
        (7.467, -31, 440),
    ]
    return ticks(lumps, 0.091, 0.13, 0)


def post():
    # frequency in Hz, level in dB, t60 in seconds.
    modes = [(830, 4, 0.39), (1270, -3, 0.44), (1710, 6, 0.3), (2220, 3, 0.45), (2800, -2, 0.38),
             (3470, 6, 0.3), (4070, 7.5, 0.13), (4680, 0, 0.43), (5626, 2, .08), (6830, -3, .15),
             (9490, -10, .3), (15530, -10, .5), (4900, -3, .3)]
    out, t = np.zeros(N), np.arange(SR // 2) / SR
    ring = 0
    rattles = 1 + .5 * evened(uniform_filter1d(rng.standard_normal((len(modes), len(t))), 200))
    for (hz, db, t60), rattle in zip(modes, rattles):
        ring = ring + voltage_ratio(db - 60 * t / min(t60, .5)) * np.sin(2 * np.pi * hz * t) * rattle
    add(out, 8.530, voltage_ratio(-28.5) * peaked(ring))
    return out


def scene():
    # frequency in Hz, gain in dB.
    mic_shelf = [(40, -8), (9700, 2), (10300, -10), (16200, -5)]
    starved = dropouts(rumble() + frost_hiss() + whine() + scrapes() + sprays())
    loud = wind() + starved + far_chopper() + near_chopper() + post()
    small = drone() + snaps() + chips() + extra_cracks() + pings() + knocks()
    return (loud + shelved(small, mic_shelf))[None]


def top_cut(x):
    return signal.sosfilt(signal.butter(12, 16430, fs=SR, output="sos"), x)


def record(dry):
    band = signal.butter(2, [300, 2500], "band", fs=SR, output="sos")
    bass = signal.sosfilt(band, dry)
    mirrored = dry + voltage_ratio(-30) * bass * np.cos(2 * np.pi * 12080 * np.arange(N) / SR)
    edge = signal.firwin(255, 15950, window=("kaiser", 9), fs=SR)
    mix = signal.oaconvolve(np.clip(mirrored, -1, 1), edge[None], "same")
    return top_cut(mix)


dry = scene()
out = record(dry)
wav_out(out)
```